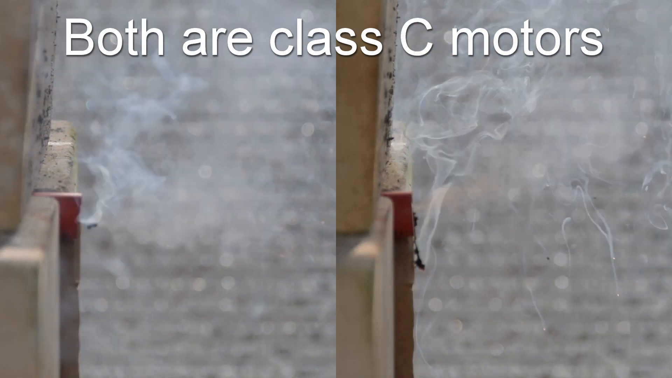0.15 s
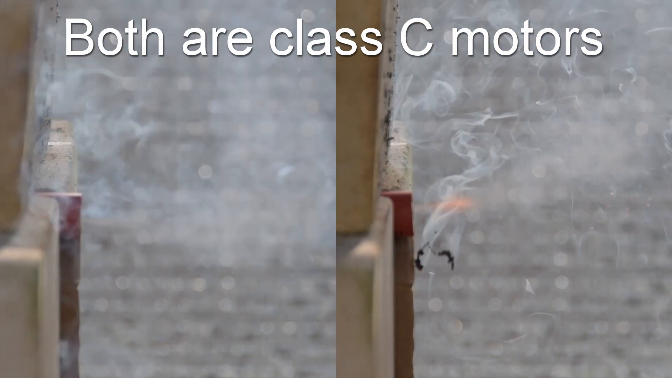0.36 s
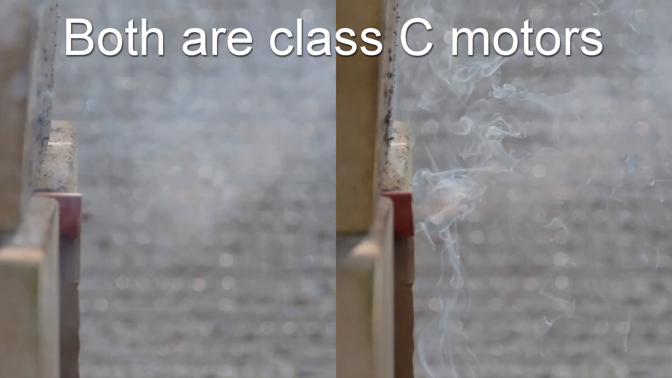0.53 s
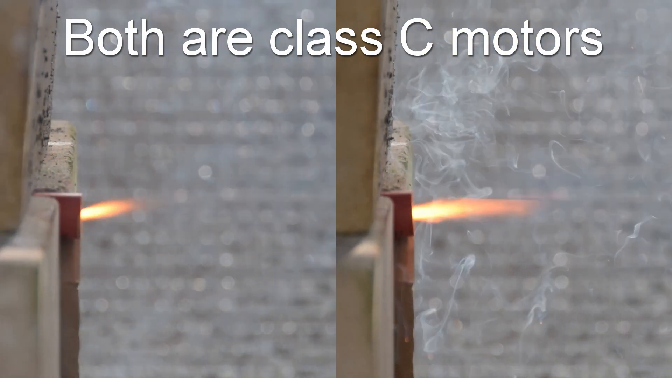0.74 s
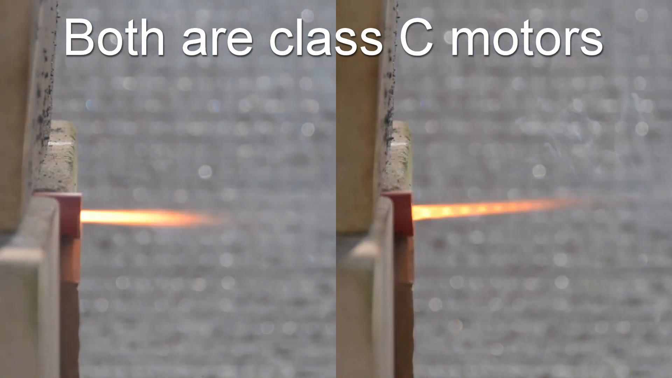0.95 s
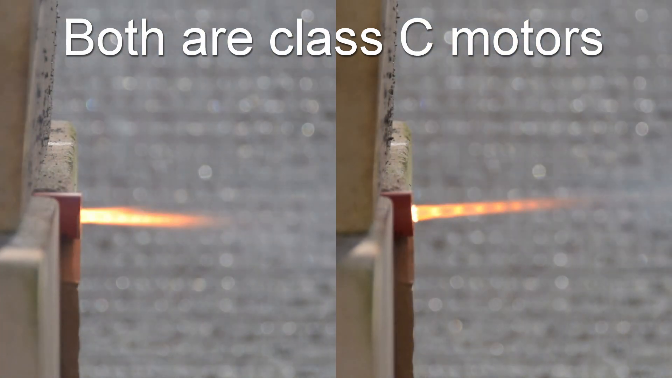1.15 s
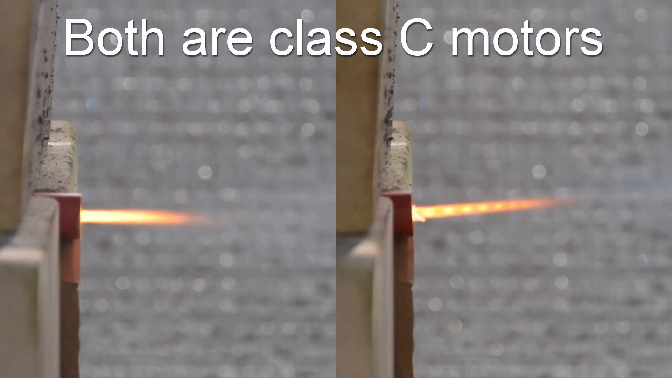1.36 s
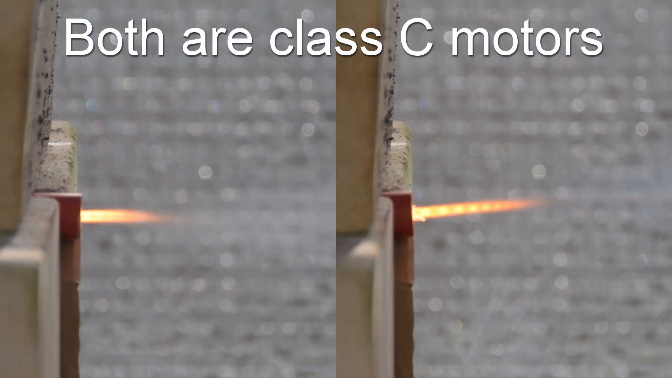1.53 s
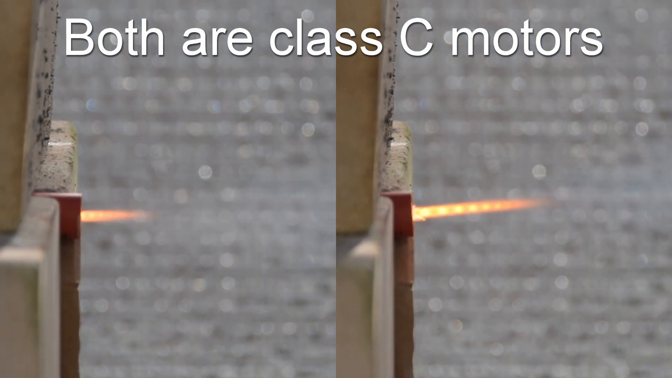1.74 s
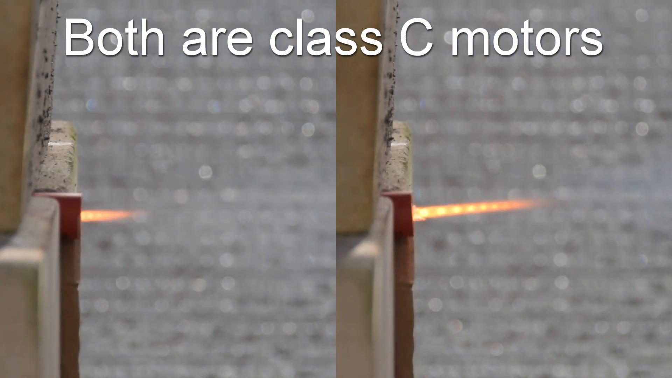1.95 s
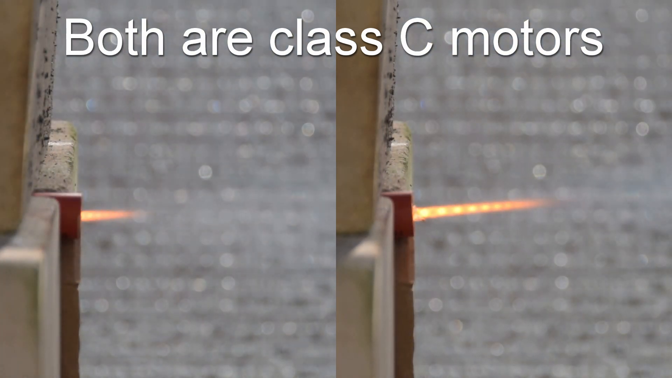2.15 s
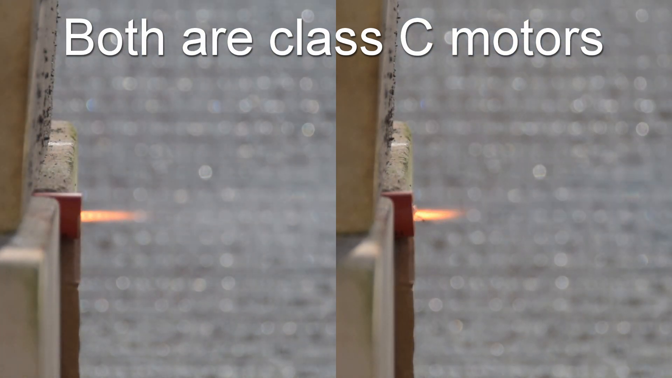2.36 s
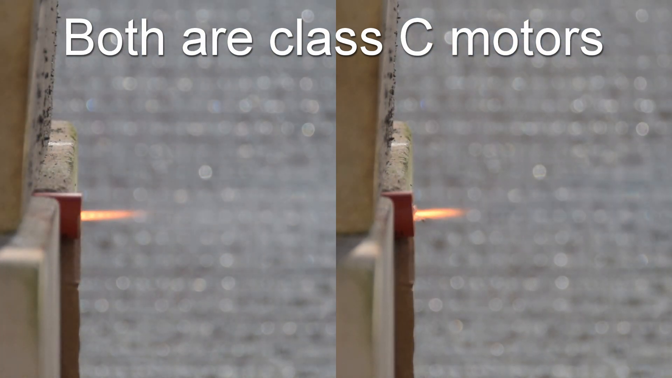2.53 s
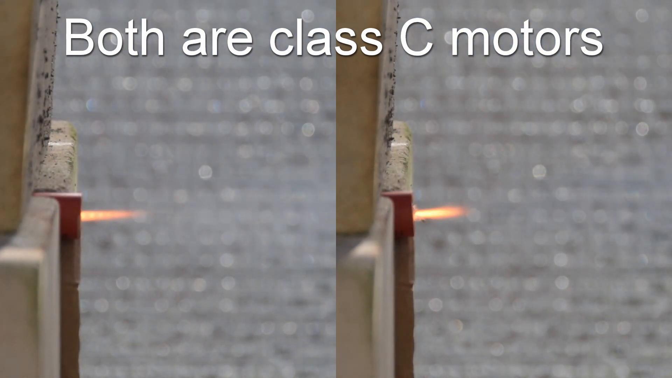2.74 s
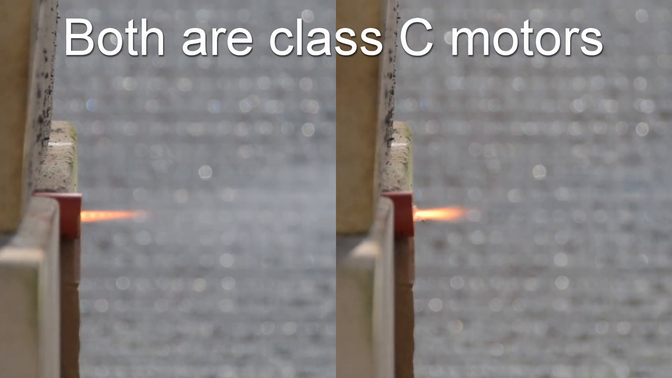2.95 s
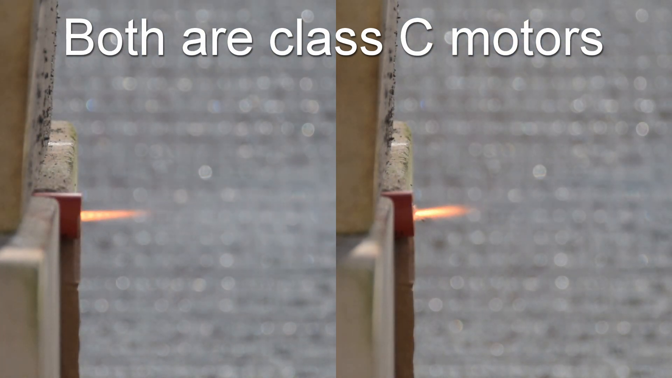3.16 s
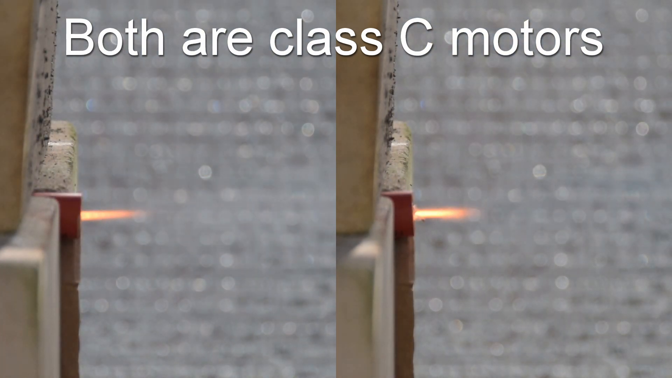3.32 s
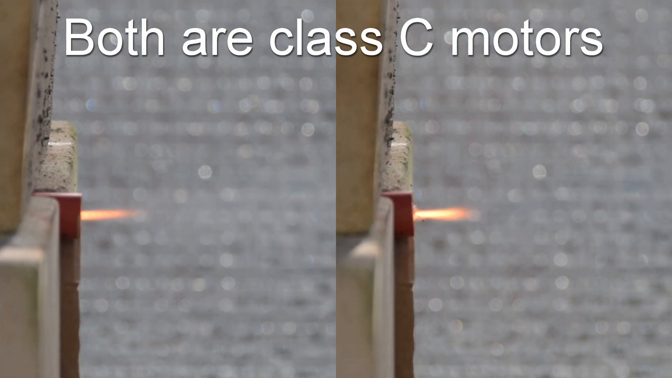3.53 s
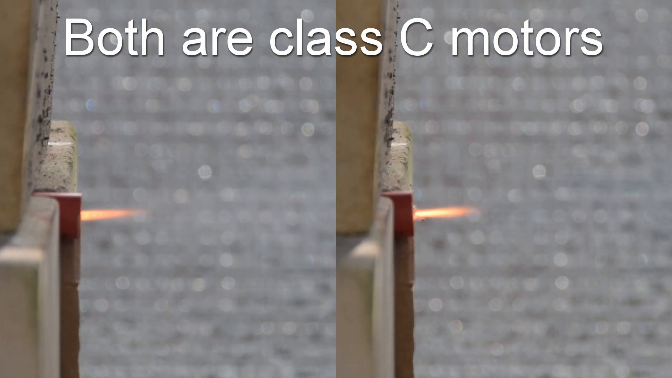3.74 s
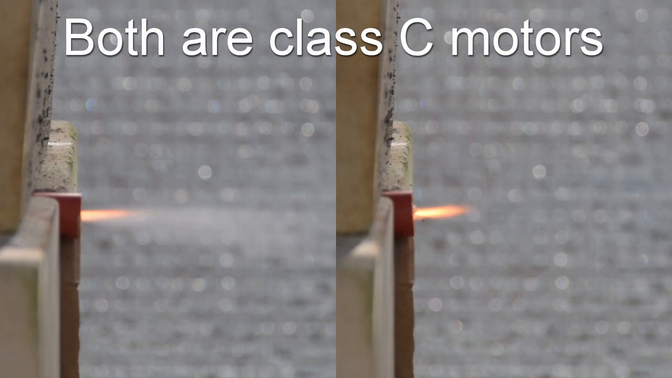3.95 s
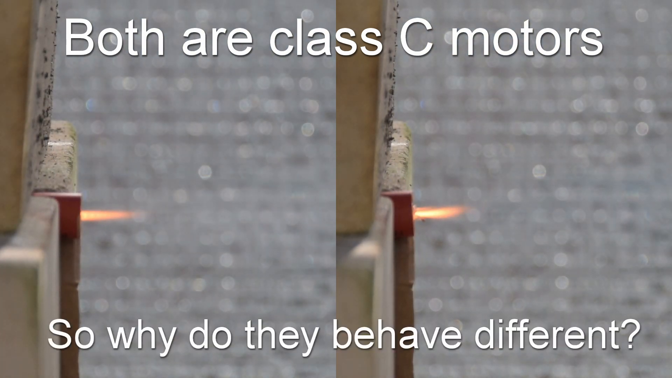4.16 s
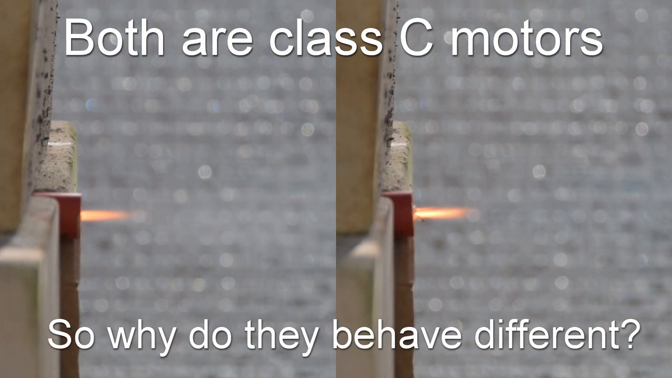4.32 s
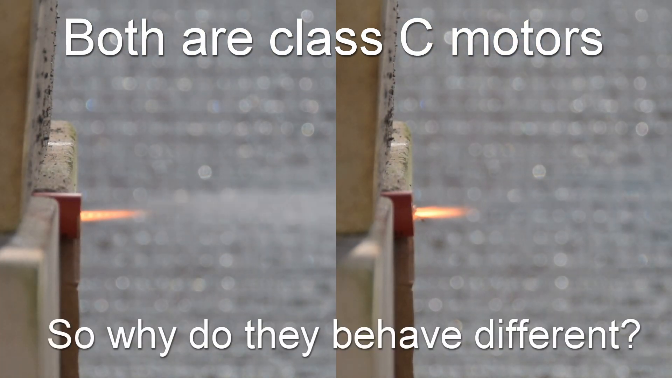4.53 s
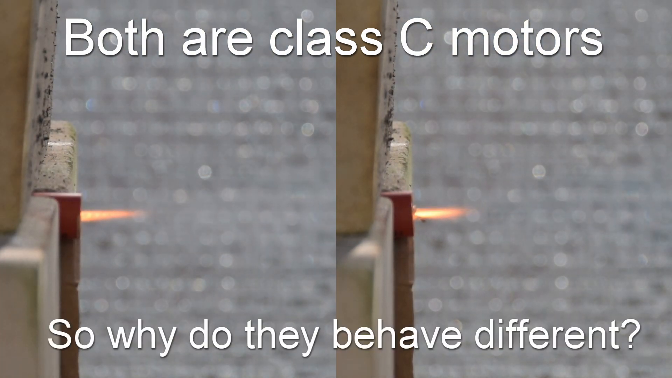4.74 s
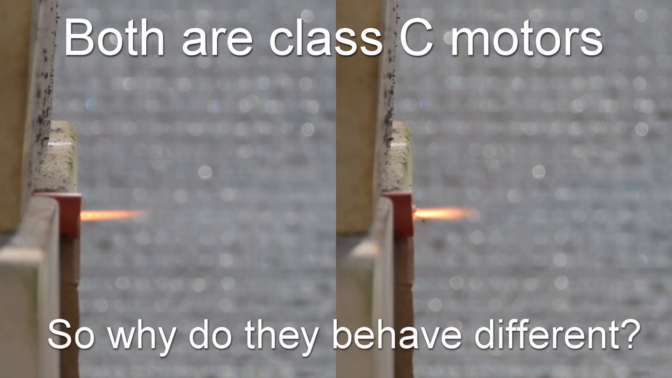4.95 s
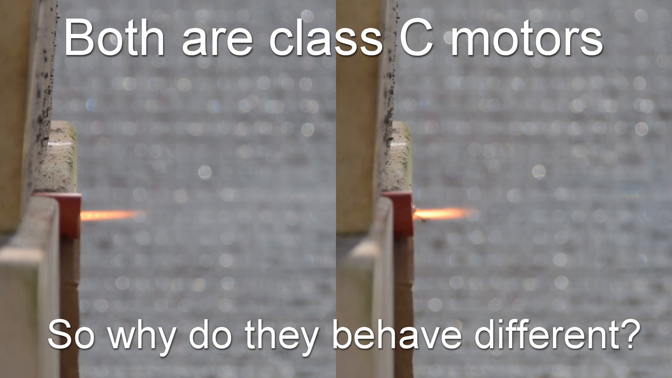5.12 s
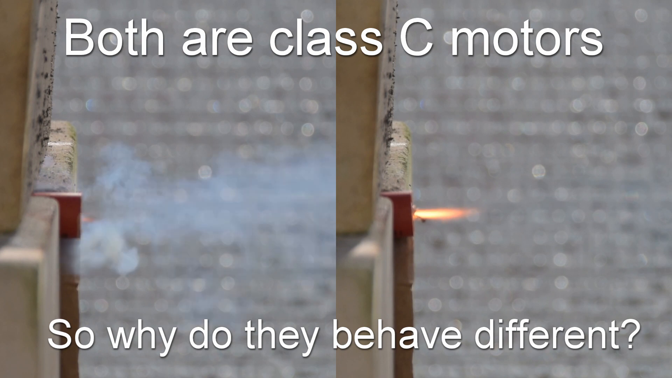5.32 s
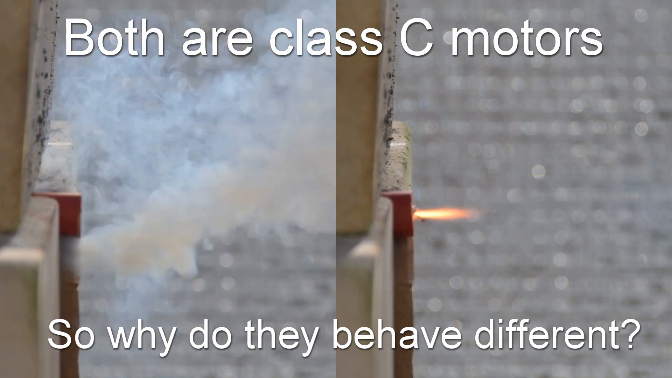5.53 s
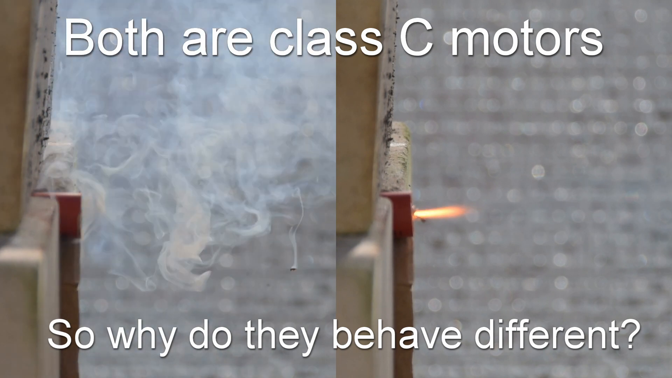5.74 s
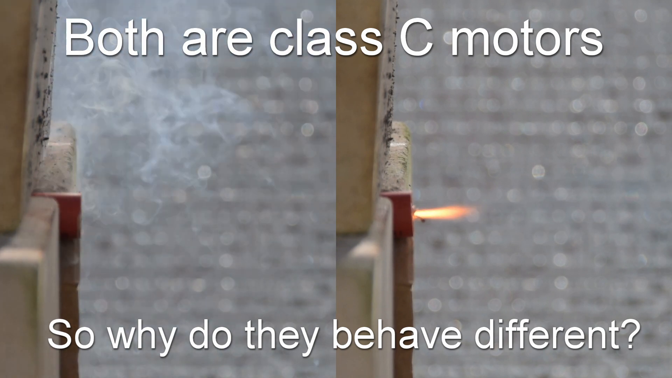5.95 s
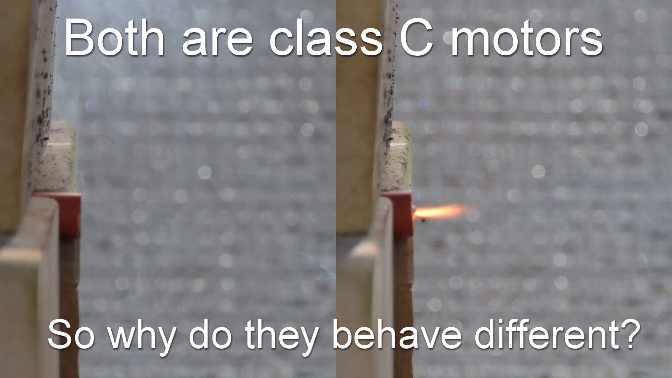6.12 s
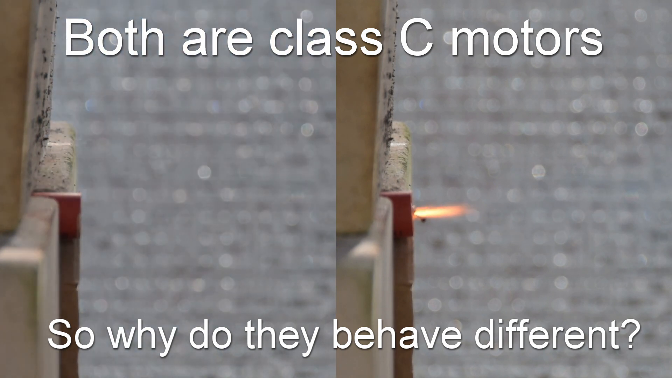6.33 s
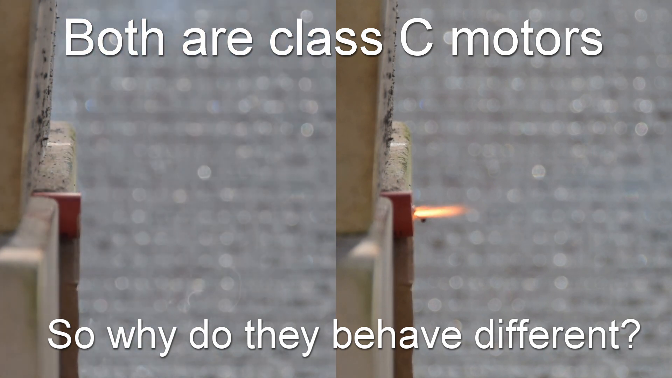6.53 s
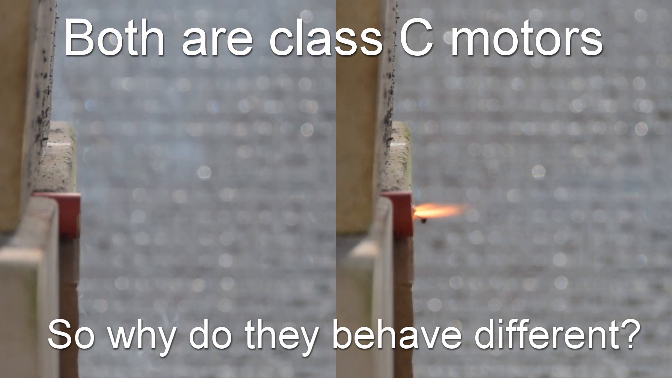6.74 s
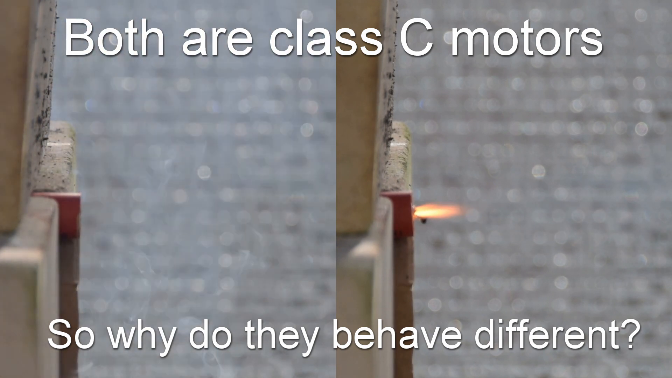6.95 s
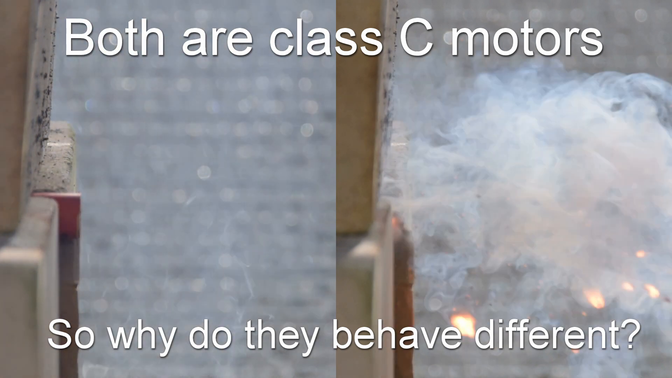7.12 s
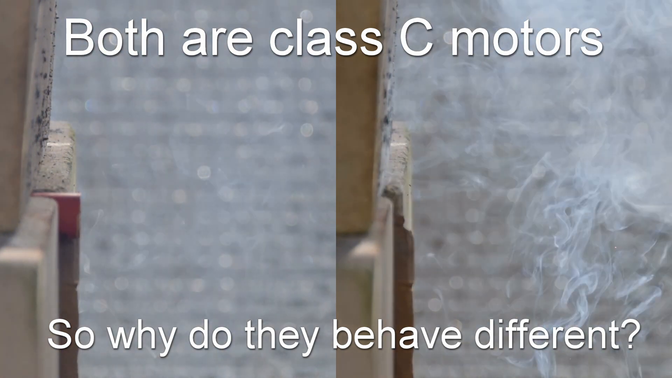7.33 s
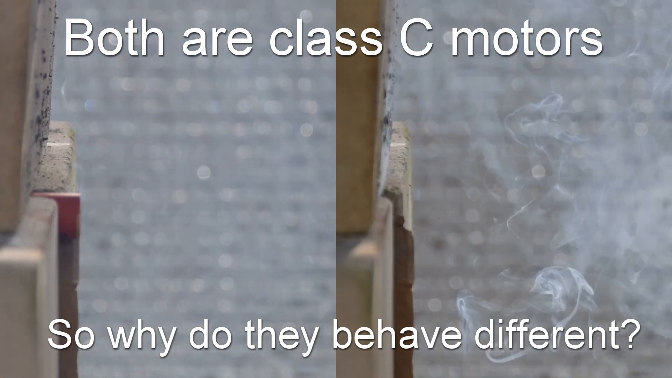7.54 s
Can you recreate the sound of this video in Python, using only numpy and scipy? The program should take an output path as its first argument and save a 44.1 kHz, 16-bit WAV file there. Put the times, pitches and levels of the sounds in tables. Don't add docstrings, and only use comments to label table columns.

```python
import sys
import numpy as np
from scipy import signal
from scipy.fft import rfft, irfft, next_fast_len
from scipy.io import wavfile
from scipy.ndimage import uniform_filter1d

SR = 44100
rng = np.random.default_rng(int(sys.argv[2]) if len(sys.argv) > 2 else 0)


def to_wav(sig):
    pcm = np.clip(np.atleast_2d(sig), -1, 1) * 32767
    pcm = np.round(pcm).astype(np.int16)
    wavfile.write(sys.argv[1], SR, pcm.T)


def rack_gain(trim_db):
    fader = np.asarray(trim_db, float)
    return 10 ** (fader / 20)


N = 334278
T = np.arange(N) / SR
SIZE = next_fast_len(N + SR)
HZ = np.arange(SIZE // 2 + 1) * SR / SIZE + 1e-3
PLUG_S = 7.084


def unit(x):
    return x / np.sqrt(np.mean(x ** 2))


def on_log(table, hz):
    f, v = np.transpose(table)
    return np.interp(np.log(hz), np.log(f), v)


def colour(x, gain):
    return irfft(rfft(x, SIZE) * gain, SIZE)[:N]


def walk(rate):
    k = int(SR / rate)
    steps = np.repeat(rng.standard_normal(N // k + 1), k)
    return unit(uniform_filter1d(uniform_filter1d(steps, k), k)[:N])


def octaves(lo):
    for hz in lo * 2. ** np.arange(9):
        yield hz, np.clip(1 - np.abs(np.log2(HZ / hz)), 0, 1)


def turbulence(spectrum, flicker_db, rate):
    noise = rfft(rng.standard_normal(SIZE)) * rack_gain(on_log(spectrum, HZ))
    return unit(sum(irfft(noise * w, SIZE)[:N] * rack_gain(flicker_db * walk(rate)) for _, w in octaves(62)))


def linger(db, seconds):
    keep = np.exp(-1 / (seconds * SR))
    return np.maximum(rack_gain(db), signal.lfilter([1 - keep], [1, -keep], rack_gain(db)))


def distant_air():
    # frequency in Hz, density in dB per Hz.
    air_spectrum = [(15, -32), (25, 2), (50, -11.5), (154, -14), (320, -9), (391, -25), (466, -6.5),
                    (636, -16), (1480, -12), (1610, -17), (5000, -28.5), (6500, -64), (11000, -120)]
    return rack_gain(-65) * turbulence(air_spectrum, 1.1, 4.4)


def yard(x):
    # frequency in Hz, t60 in s.
    wall_decay = [(100, 1), (500, 0.79), (2000, 0.72), (6000, 0.67), (14000, 0.2)]
    noise = rfft(rng.standard_normal(SIZE))
    tail = sum(irfft(noise * w, SIZE)[:N] * np.exp(-np.log(1000) * T / on_log(wall_decay, hz))
               for hz, w in octaves(65))
    tail = tail * np.clip(T / 0.017, 0, 1) * (T < 1)
    early = rng.standard_normal(N) * (rng.random(N) < .03)
    early = early * np.exp(-T / .025) * (T > .005)
    both = tail / np.sqrt(np.sum(tail ** 2)) + rack_gain(9.0) * early / np.sqrt(np.sum(early ** 2))
    return rack_gain(-17.5) * colour(x, rfft(both, SIZE))


def stand(gas, share):
    # delay in ms, share of the direct amplitude.
    reflections = [(0.293, -0.17), (0.592, 0.099), (0.659, 0.78), (.74, 0.31), (.92, 0.14), (1.1, 0.092),
                   (3.42, 0.22), (4.08, 0.3)]
    comb = sum(g * np.exp(-2j * np.pi * HZ * ms / 1000) for ms, g in reflections)
    echo = colour(gas, comb / (1 + (HZ / 22000) ** 2))
    return (gas + share * echo) / np.sqrt(1 + share ** 2)


def tube():
    # start in s, level in dB, t60 in s.
    blows = [
        (7.16, -37, 0.8),
        (7.345, -42, .45),
        (5.46, -53, 2),
    ]
    # resonance in Hz, width in Hz, level in dB.
    modes = [
        [(704, 86, 1), (1090, 84, -8)],
        [(851, 58, -0.5), (1450, 57, 1), (1850, 34, -2), (2270, 41, -1)],
        [(920, 110, 0)],
    ]
    swell_s, lead_s = .003, .05
    out, hz = np.zeros(N + SR), np.arange(SR // 2 + 1)
    t = T[:SR] - lead_s
    for (s, db, t60), peaks in zip(blows, modes):
        i = int(s * SR) - SR // 20
        for f, width, peak_db in peaks:
            resonance = 1 / (1 + (2 * (hz - f) / width) ** 2)
            air = unit(irfft(rfft(rng.standard_normal(SR)) * resonance, SR))
            fall = np.log(1000) / t60 * (f / peaks[0][0]) ** 1.1
            out[i:i + SR] += rack_gain(db + peak_db) * air * np.exp(np.where(t < 0, t / swell_s, -fall * t))
    return out[:N]


def puffs():
    # start in s, peak in dB, swell in ms, t60 in s, centre in Hz.
    bursts = [(7.083, -12, 3, 0.012, 7700), (7.078, -27, 11, 0.042, 4400), (7.081, -11, 3.4, 0.022, 1300),
              (7.088, -16, 1.5, 0.32, 660), (7.122, -25.5, 20, 0.23, 2000), (7.341, -35.5, .5, 0.23, 2000),
              (7.356, -36.5, 4.2, 0.14, 2600), (7.375, -46, 16, 0.15, 3000), (7.56, -50, .5, 0.015, 12000),
              (7.558, -50, 1, 0.33, 560), (7.565, -49.5, .5, .25, 1300), (7.16, -42.5, 25, 0.54, 1800),
              (7.11, -36, 12, 0.76, 210), (7.35, -49, 3, .5, 830)]
    out = np.zeros(N)
    for s, db, swell_ms, t60, hz in bursts:
        tilt_db = -3 + 0.14 * (db + 8)
        i = int((s - .05) * SR)
        t, size = T[i:] - s, next_fast_len(N - i)
        f = np.arange(size // 2 + 1) * SR / size + 1
        octave = np.log2(f / hz)
        noise = rfft(rng.standard_normal(size)) * rack_gain(np.where(octave > 0, tilt_db, 5.5) * octave)
        scale = rack_gain(db) / np.std(irfft(noise, size))
        for band in 60 * 2. ** np.arange(9):
            window = np.clip(1 - np.abs(np.log2(f / band)), 0, 1)
            part = irfft(noise * window, size)[:N - i]
            fall = np.log(1000) / t60 * max(band / hz, 1) ** 0.62
            out[i:] += scale * part * np.exp(np.where(t < 0, 1000 * t / swell_ms, -fall * t))
    return stand(out, 0.13)


def blow_out():
    # start in s, peak in dB.
    slaps = [
        (7.083, -2),
        (7.088, -27),
        (7.095, -4.5),
        (7.109, -16),
        (7.119, -18),
        (7.138, -14.5),
    ]
    # mode in Hz, level in dB, decay time in s; the mode falls by 60 dB in 0.34 of this time.
    case_modes = [(247, -21, 0.058), (440, -15.5, .15), (500, -0.5, 0.17), (562, -8.5, .15),
                  (673, -8, 0.23), (727, 0.5, 0.23), (773, -5.5, 0.28), (1070, -9, .15), (1180, -11, .12),
                  (1420, -17, 0.085), (1860, -4, .1), (2360, -4, 0.059)]
    t = T[:SR // 2]
    out = np.zeros(N)
    for s, db in slaps:
        gains = rack_gain(3.0 * rng.standard_normal(len(case_modes)))
        detune = 1 + 0.027 * rng.standard_normal()
        ring = 0
        for g, (f, mode_db, t60) in zip(gains, case_modes):
            decay = np.exp(-np.log(1000) * t / (0.34 * t60))
            ring = ring + g * rack_gain(mode_db) * np.sin(2 * np.pi * f * detune * t) * decay
        i = int(s * SR)
        out[i:i + len(t)] -= (rack_gain(db) * ring / np.max(np.abs(ring)))[:N - i]
    return out


def dent(hz):
    u = np.arange(-1, 3, hz / SR)
    return -np.cos(2.22 * u * np.pi) * np.exp(-(u / np.where(u < 0, .1, .45)) ** 2)


def sweeps():
    # start in s, length in s, level in dB.
    gusts = [(0.747, 0.086, -13.5), (.756, 0.017, -12.5), (1.007, 0.011, -23), (1.047, 0.013, -22),
             (1.088, .02, -17.5), (1.106, .04, -13.5), (1.149, 0.087, -17.5), (1.259, 0.059, -23),
             (1.375, 0.034, -28.5), (1.413, 0.034, -22), (1.481, 0.016, -26)]
    rise_db_s, sag_db_s, fall_db_s = 1998, 28, 1296
    return np.max([db - rise_db_s * np.maximum(s - T, 0) - sag_db_s * np.clip(T - s, 0, length)
                   - fall_db_s * np.maximum(T - s - length, 0) for s, length, db in gusts], axis=0)


def buffet():
    # knock frequency in Hz, rate per s, level in dB.
    eddies = [(71, 130, -6.5), (140, 160, -2.5), (283, 360, -3.5), (564, 600, -1), (983, 800, -4.5),
              (1770, 740, -4.5)]
    # time in s, peak in dB, frequency in Hz.
    thumps = [
        (.749, -8, 170),
        (1.053, -10, 250),
        (1.134, -9, 250),
        (1.2, -5, 280),
        (1.277, -9, 250),
        (1.31, -13, 300),
        (1.389, -12, 400),
        (1.399, -8, 450),
        (1.438, -8, 300),
        (1.482, -8, 350),
    ]
    knocks = 0
    for hz, rate, size_db in eddies:
        hits = (rng.random(N) < rate / SR) * rack_gain(np.clip(7.6 * rng.standard_normal(N), -9, 7))
        knock = dent(hz) - np.mean(dent(hz))
        knocks = knocks + rack_gain(size_db) * unit(signal.fftconvolve(hits, knock)[:N])
    out = rack_gain(sweeps() + 2.0) * unit(np.tanh(.5 * unit(knocks)))
    for s, db, hz in thumps:
        shape, i = dent(hz), int((s - 1 / hz) * SR)
        out[i:i + len(shape)] += rack_gain(db - 0.4) * shape
    return out


def jet():
    # time in s, level in dB.
    igniter = [
        (0, -71),
        (.4, -76),
        (.55, -76.5),
        (.586, -65),
        (.598, -47.5),
        (.618, -40),
        (.695, -35.5),
        (.738, -28),
    ]
    # time in s, level in dB.
    thrust = [(.748, -23), (.77, -18), (.88, -17.5), (.92, -15.5), (1.085, -12), (1.24, -15), (1.6, -16.5),
              (1.95, -17.5), (2.33, -18.5), (2.42, -21.5), (3.35, -22), (5.18, -21.5), (5.25, -29.5),
              (5.302, -38), (5.44, -44.5), (5.64, -45.5), (5.9, -44), (7.08, -45)]
    # time in s, rise in dB.
    flares = [
        (.21, 7.1),
        (.4, 6),
    ]
    # time in s, rise in dB.
    chuffs = [(1.77, 2.5), (2.21, 4), (2.38, 8.5), (3.06, 9.5), (3.48, 10), (3.72, 5), (4.04, 4), (4.48, 9),
              (4.62, 11), (5.6, 12), (6.67, 9), (6.82, 6)]
    # hiss in dB, roar in dB above it, rumble in dB above it.
    eddy_law = [(-75, 0, -5), (-44, -8, -18), (-38.5, -9, -19.5), (-22, -10.5, -21.5), (-18.5, -10.5, -20),
                (-11.5, -8, -12.5)]
    # frequency in Hz, density in dB per Hz.
    hiss_spectrum = [(1180, -40), (2000, -2.5), (2510, -6.5), (2980, -1), (3940, -1), (4340, -2.5),
                     (6820, -1.5), (9090, -1.5), (13700, -6.5), (16000, -15.5)]
    roar_spectrum = [(150, -24.5), (400, -11), (800, -3), (1300, -1.5), (2000, -2.5), (2600, -2.5),
                     (3500, -33)]
    rumble_spectrum = [(20, -31), (50, -23.5), (110, -11.5), (300, -3.5), (390, -4.5), (480, 0.5),
                       (700, -0.5), (1000, -12.5), (1600, -35.5)]
    roar_linger_s, rumble_linger_s, flare_fade_s, chuff_s = 0.055, 0.11, .07, 0.019
    light_s, light_db, light_swell_s, light_fade_s = 0.743, 12.5, 0.03, 0.1
    igniter_share, jet_share, fading_share = 0.74, 0.28, 0.099

    hiss_db = np.interp(T, *np.transpose(igniter + thrust))
    hiss_db = hiss_db + sum(db * (T > s) * np.exp(-np.abs(T - s) / flare_fade_s) for s, db in flares)
    flow_db, *above = np.transpose(eddy_law)
    roar_db, rumble_db = (hiss_db + np.interp(hiss_db, flow_db, a) for a in above)
    late = T - light_s
    roar_db = roar_db + light_db * np.exp(-np.abs(late) / np.where(late < 0, light_swell_s, light_fade_s))
    chuff_db = sum(db * np.exp(-((T - s) / chuff_s) ** 2) for s, db in chuffs)

    hiss = rack_gain(hiss_db) * turbulence(hiss_spectrum, 0.3, 11)
    roar = linger(roar_db, roar_linger_s) * turbulence(roar_spectrum, 1.0, 12)
    rumble = linger(rumble_db, rumble_linger_s) * turbulence(rumble_spectrum, 1.3, 25)
    rumble = rumble * rack_gain(chuff_db + 1.5 * walk(11))
    surge = rack_gain(.5 * walk(14) + 0.32 * walk(90)) * (T < PLUG_S)
    fading = linger(hiss_db, roar_linger_s) > 1.5 * rack_gain(hiss_db)
    share = np.where(late < 0, igniter_share, np.where(fading, fading_share, jet_share))
    return stand(surge * (hiss + roar + rumble), np.clip(uniform_filter1d(share, size=900), 0, 1))


def scene():
    # frequency in Hz, gain in dB.
    response = [(15, -36), (35, -10), (60, -0.5), (10000, -1), (13500, -7.5), (16000, -12)]
    mic = rack_gain(on_log(response, HZ))
    motor = jet() + colour(puffs() + blow_out(), mic)
    mono = distant_air() + yard(motor) + tube() + colour(buffet(), mic) + motor
    return np.array([mono, mono])


def side_noise(mono):
    # centre time in s, low edge in Hz.
    patches = [(1.11, 5000), (1.157, 13050), (1.157, 14400), (1.18, 6900), (1.366, 4200), (1.366, 8250),
               (1.505, 6250), (1.598, 5350), (1.598, 14400), (1.807, 6250), (1.807, 8600), (1.877, 4200),
               (1.877, 5600), (1.877, 9600), (1.877, 12350), (1.877, 14400), (2.062, 8250), (2.248, 11700),
               (2.411, 9600), (2.643, 10300), (2.643, 12350), (2.829, 7550), (2.829, 11700), (3.061, 12400),
               (3.34, 10700), (3.432, 8900), (4.268, 8600), (4.524, 5100), (4.57, 4800), (4.593, 10300)]
    width_hz, size = 1370, 2048
    mid, side = mono.copy(), np.zeros(N)
    window = signal.windows.tukey(size, .9)
    f = np.arange(size // 2 + 1) * SR / size
    for s, lo in patches:
        i = int(s * SR) - size // 2
        inside = (f > lo) & (f < lo + width_hz)
        band = irfft(rfft(mono[i:i + size]) * inside, size)
        noise = unit(irfft(rfft(rng.standard_normal(size)) * inside, size))
        mid[i:i + size] -= (1 - np.sqrt(.5)) * window * band
        side[i:i + size] += np.sqrt(.5) * window * np.std(band) * noise
    return np.array([mid + side, mid - side])


def top_cut(x):
    return signal.sosfilt(signal.butter(12, 16300, fs=SR, output="sos"), x)


def record(dry):
    top_hz, slope_hz = 15820, 160
    edge = np.sin(np.clip((top_hz - HZ) / slope_hz, 0, 1) * np.pi / 2) ** 2
    mono = colour(np.tanh(0.94 * dry[0]) / 0.96, edge)
    mix = side_noise(mono)
    return top_cut(mix)


dry = scene()
out = record(dry)
to_wav(out)
```